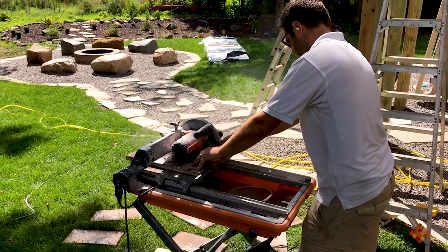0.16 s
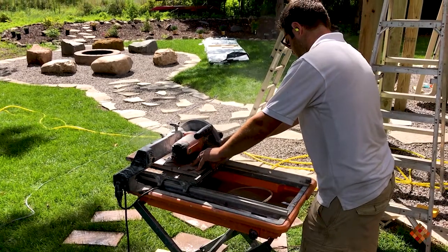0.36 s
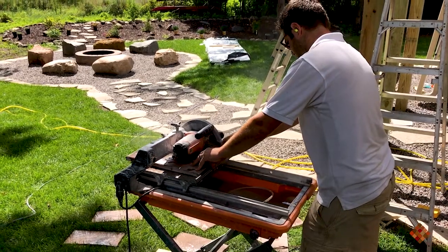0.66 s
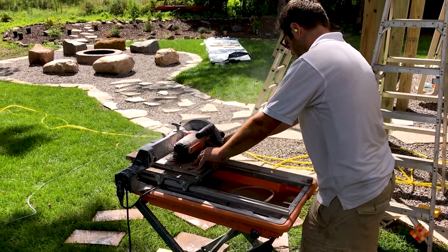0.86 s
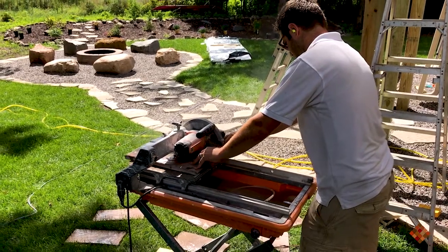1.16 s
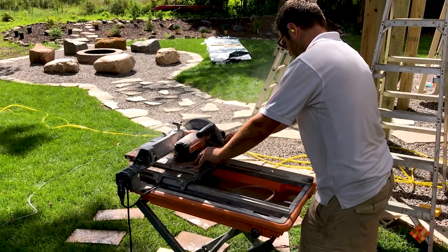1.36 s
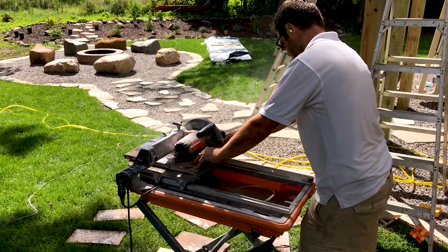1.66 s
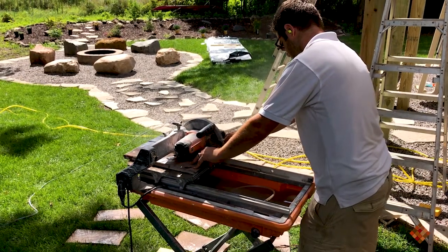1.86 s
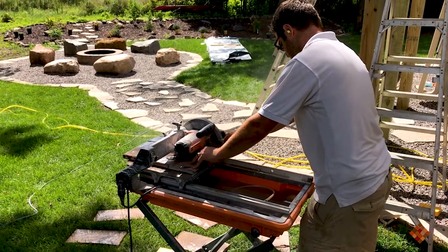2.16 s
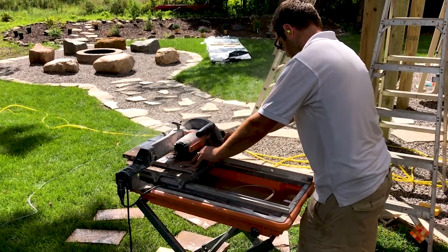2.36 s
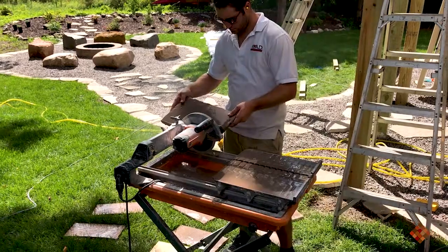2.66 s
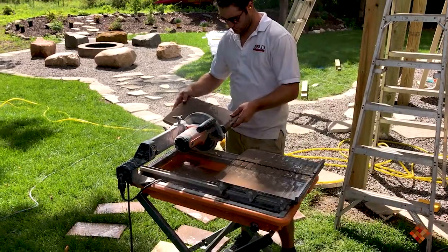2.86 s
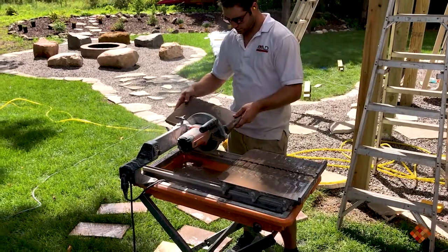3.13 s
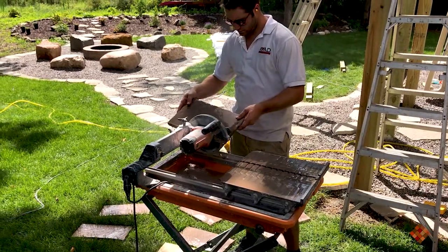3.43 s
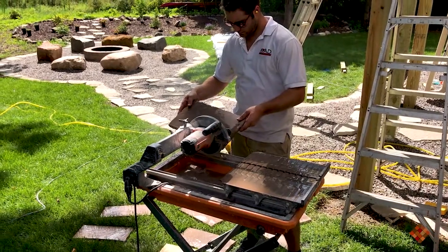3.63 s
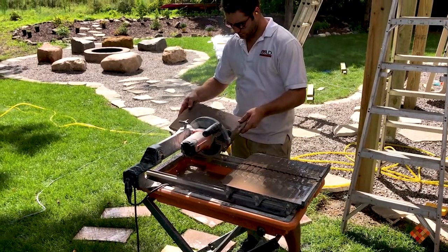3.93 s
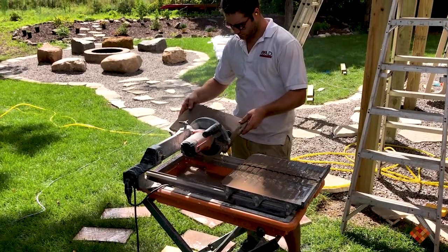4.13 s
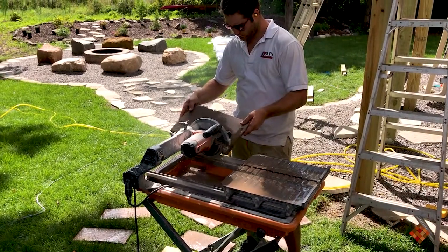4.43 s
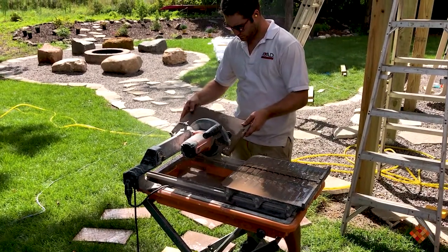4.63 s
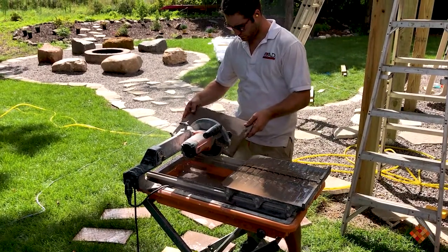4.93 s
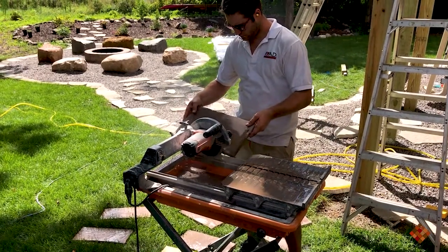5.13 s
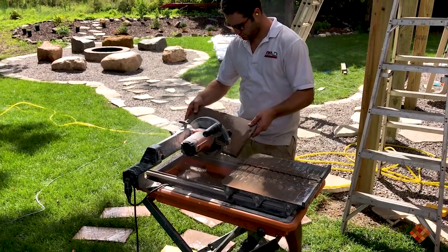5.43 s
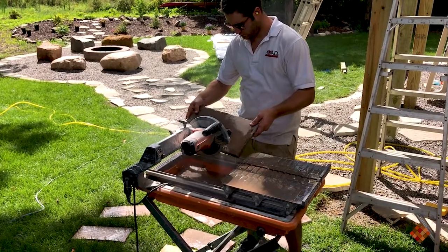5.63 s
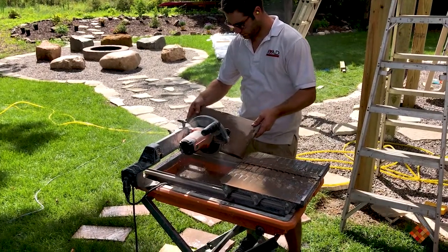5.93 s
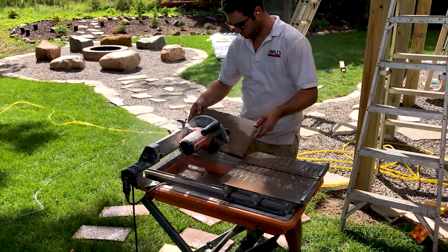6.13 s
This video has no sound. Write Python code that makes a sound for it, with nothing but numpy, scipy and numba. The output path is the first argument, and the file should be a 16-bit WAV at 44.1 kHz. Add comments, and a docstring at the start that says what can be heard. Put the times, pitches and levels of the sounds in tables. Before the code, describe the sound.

A wet tile saw cuts concrete tile outdoors, a few metres away, and sounds without a break for about six seconds. From the start, a deep cut gives a gritty rasp and a high, ringing steel whine, with hissing water spray and a quieter motor hum beneath. Around 1.2 seconds the motor sags under load and the blade squeals briefly; it speeds up again, with more short squeals near 2.4 seconds. At about 2.5 seconds the sound jumps to a lighter trimming cut with a higher motor pitch. Its opening stutters, restarting at roughly 3, 3.5, 3.8, 4.3 and 4.8 seconds, mostly with a soft low thump, and is a little quieter between 3 and 3.5 seconds. From 4.8 seconds the trim plays through, with pulsing spray, short metallic squeals and a slightly sinking whine, still cutting at the end.

```python
"""A wet tile saw cutting

A few metres away on a lawn, a saw grinds through concrete: a deep cut drags the motor down, then
the sound jumps to a light trim of a hand-held tile, whose opening stutters before it plays through.
Diamond grit chips the stone and rings the steel blade, water spray hisses and the geared motor hums."""
import sys
import numpy as np
from scipy import signal
from scipy.fft import rfft, irfft, next_fast_len
from scipy.io import wavfile
from scipy.ndimage import uniform_filter1d
from numba import njit

SR = 44100
rng = np.random.default_rng(int(sys.argv[2]) if len(sys.argv) > 2 else 0)


def master_out(mix):
    """Clip the mix to full scale and print it as 16-bit PCM to the path in sys.argv[1]."""
    frames = np.transpose(np.atleast_2d(mix))
    ceiling = np.clip(frames, -1, 1)
    pcm = np.round(ceiling * 32767).astype(np.int16)
    wavfile.write(sys.argv[1], SR, pcm)


N = 277564

# How fast the blade spins as the load changes. Each row: time in seconds, turns per second.
CUT_SPIN = [(0, 81.2), (.95, 81.1), (1.25, 76.1), (1.55, 76.9), (1.8, 79.6), (2.2, 82.7), (2.38, 86.1),
            (2.54, 87.2)]
TRIM_SPIN = [(4.85, 100.9), (5.42, 99.5), (5.6, 97.6), (6.28, 96.9)]


def saw(t, deep):
    """One pass through the stone: the deep cut if deep is true, otherwise the light trim."""
    speed = follow(CUT_SPIN if deep else TRIM_SPIN, t) * (1 + 0.00095 * wander(t, 25.86))
    turns = np.cumsum(speed) / SR
    # faster spin stiffens the disc and raises its notes
    pitch = (speed / speed[:SR // 2].mean()) ** (0.0254 if deep else 0.14)
    rasp, ring, spray = effort(t, deep)
    strikes = grit(t, turns, deep, spread_db=2.0 if deep else 2.5)
    stone = stone_and_spray(t, turns, rasp, spray, deep)
    steel = blade(t, strikes, pitch, rasp, ring, spray, deep)
    singing = ring * whine(t, pitch, deep)
    return stone + steel + singing + motor(t, speed, turns, deep)


# How hard the stone is pushed. Each row: time in seconds, relative level of the rasp in dB.
CUT_PRESSURE = [(0, -0.8), (.4, -0.3), (1.1, 1), (1.35, 1.5), (1.47, -1), (1.62, 0.8), (1.72, 1.1),
                (2.54, -0.5)]
TRIM_PRESSURE = [(4.85, 0.8), (5.25, 0.41), (5.42, 0.49), (5.62, -1.9), (5.9, -1.2), (6.28, -0.013)]
# Moments when the blade bites deeper. Each row: peak time in seconds, fade time in seconds,
# change of the spray in dB, change of the ringing in dB.
DEEP_BITES = [(.04, 0.1, 2, 2), (.26, .05, 5.5, -0.5), (.6, 0.067, 3, 2.5), (.85, 0.086, 2.5, 1),
              (1.07, 0.057, 3, 1.5), (1.28, 0.12, 3.5, 0), (1.82, 0.13, 2, 2.5), (1.99, 0.015, -2, 5),
              (2.2, 0.035, 1.5, 2), (2.42, 0.096, 0, 2), (4.86, 0.075, 5, 2.5), (5.02, 0.076, 4, 1),
              (5.18, 0.044, 4, -0.5), (5.3, 0.099, 4.2, 1.5), (5.49, .035, 4.2, 1.5), (5.71, 0.037, 5.2, 4),
              (5.89, 0.034, 4.5, 3.5), (6.28, 0.14, 6.5, 1)]


def effort(t, deep):
    """Strength of rasp, ring and spray: pushing sets them, bites swell them, uneven stone shakes them."""
    push_db = follow(CUT_PRESSURE if deep else TRIM_PRESSURE, t)
    bite_ring_db = bite_spray_db = 0
    for peak, fade, spray_change, ring_change in DEEP_BITES:
        width = np.where(t < peak, 0.73 * fade, fade)  # rises faster than it fades
        swell = np.exp(-((t - peak) / width) ** 2)
        bite_ring_db += ring_change * swell
        bite_spray_db += spray_change * swell
    grain_hz = 31.83
    rasp_db = push_db + 0.16 * bite_ring_db + 0.5 * wander(t, grain_hz)
    ring_db = 0.74 * push_db + bite_ring_db + 0.44 * wander(t, grain_hz)
    spray_db = 0.11 * push_db + bite_spray_db + 0.58 * wander(t, grain_hz)
    return [unit(undb(db)) for db in (rasp_db, ring_db, spray_db)]


def grit(t, turns, deep, spread_db):
    """Countless tiny chips of uneven size break off; the blade's high side bites harder once a turn."""
    wobble, chatter_db = (0.18, 0.56) if deep else (0.019, 0.5)
    noise = rng.standard_normal(len(t))
    sizes = np.repeat(rng.standard_normal(len(t) // 16 + 1), 16)[:len(t)]  # 16 samples a chip
    chips = noise * undb(spread_db * sizes)
    bite = np.exp(wobble * (np.cos(2 * np.pi * turns) + 0.5 * np.cos(4 * np.pi * turns)))
    return unit(chips * bite * undb(chatter_db * wander(t, 70)))


# The notes that ring in the buried blade and the tile (cut), and in the nearly free blade (trim).
# Each row: pitch in Hz, width in Hz (narrow rings longer), relative level in dB.
CUT_RINGING = [(837, 19, -47.5), (1127, 146, -36), (1234, 53, -45.5), (1507, 5.5, -51), (1615, 54, -38),
               (2186, 27, -41.5), (2998, 30, -34), (2990, 110, -41.5), (3292, 110, -34), (3404, 56, -36.5),
               (3536, 52, -35), (3828, 23, -37), (3910, 36, -42.5), (3926, 20, -39.5), (4050, 45, -35.5),
               (4590, 35, -38.5), (4984, 86, -39), (5520, 64, -38), (5844, 69, -38), (6500, 85, -57),
               (6840, 110, -43), (7290, 20, -43), (7960, 49, -44), (8140, 340, -36.5), (8920, 80, -41.5),
               (9535, 110, -35), (11400, 330, -34), (11600, 130, -43.5), (12800, 170, -41.5),
               (14400, 400, -44)]
TRIM_RINGING = [(1159, 61, -38), (1322, 19, -45.5), (1682, 17, -39.5), (2270, 21, -43.5), (3064, 64, -39.5),
                (3310, 52, -36), (3538, 43, -31), (3840, 100, -34), (3853, 120, -36), (3970, 27, -37.5),
                (3954, 14, -41), (4032, 38, -37.5), (4624, 220, -37), (4920, 11, -45), (5010, 30, -35),
                (5800, 9.9, -48.5), (5790, 24, -34.5), (6130, 22, -37.5), (5940, 170, -53),
                (6770, 420, -33), (7918, 18, -46), (8000, 32, -41.5), (8940, 53, -56), (9430, 31, -39.5),
                (9780, 28, -44), (9940, 88, -57), (11780, 160, -39.5), (12240, 61, -34), (13600, 49, -38),
                (14117, 22, -61)]


def blade(t, strikes, pitch, rasp, ring, spray, deep):
    """Grit rings the steel; the shifting contact favours one note, then another."""
    notes, swell_db, level_db = (CUT_RINGING, 0.43, -0.62) if deep else (TRIM_RINGING, 0.64, -2.5)
    out = 0
    for k, (hz, width, db) in enumerate(notes):
        strength = rasp if hz < 2750 else ring if hz < 7100 else spray
        contact = np.roll(strikes, 7 * k) * undb(swell_db * wander(t, 22))
        out += undb(db) * unit(resonate(contact * strength, hz * pitch, float(width)))
    return undb(level_db) * out


# The broad noise of breaking stone and water. Each row: frequency in Hz, relative level in dB.
CUT_NOISE = [(30, -90), (90, -90.5), (190, -84.5), (330, -73), (440, -90.5), (560, -71.5), (850, -70),
             (1200, -66.5), (1850, -76.5), (3500, -62), (4400, -73), (10500, -74), (14500, -68),
             (15700, -74)]
TRIM_NOISE = [(30, -93), (80, -80), (190, -88.5), (280, -78), (420, -84.5), (560, -74.5), (900, -75),
              (1400, -69.5), (2600, -66.5), (3500, -68.5), (4300, -72), (8000, -70.5), (14000, -70.5),
              (15700, -76)]


def stone_and_spray(t, turns, rasp, spray, deep):
    """Coarse chips make the low rasp; fine grit and water make the high hiss."""
    spectrum, level_db = (CUT_NOISE, -1) if deep else (TRIM_NOISE, 0.3)
    chips = grit(t, turns, deep, spread_db=0.5 if deep else 2.5)
    broad = shimmer(colour(chips, spectrum), depth_db=7.0 if deep else 6.5, spacing_hz=44.8)
    coarse = signal.sosfiltfilt(signal.butter(2, 4000, fs=SR, output="sos"), broad)
    fine = broad - coarse
    return undb(level_db) * (coarse * rasp + fine * spray)


def shimmer(x, depth_db, spacing_hz):
    """The disc's many high notes carve narrow peaks and dips into the hiss."""
    size = next_fast_len(len(x))
    hz = np.fft.rfftfreq(size, 1 / SR)
    ripple = np.interp(hz / spacing_hz, np.arange(2048), rng.standard_normal(2048))
    gain = undb(depth_db * np.clip(hz / 10000, 0, 1) * ripple)
    gain /= np.sqrt(uniform_filter1d(gain ** 2, len(hz) // 20))  # keeps the overall balance
    return irfft(rfft(x, size) * gain, size)[:len(x)]


# Thin, lasting tones of the rubbed rim. Each row: pitch in Hz, relative level in dB.
CUT_RIM_TONES = [(3892, -35.5), (4570, -55), (7230, -43), (7983, -58), (9012, -53), (9507, -56),
                 (11235, -59), (12936, -61)]
TRIM_RIM_TONES = [(1168, -45), (2277, -41), (3074, -42), (3329, -51), (4812, -39), (5026, -37), (5798, -50),
                  (6158, -41), (6818, -39), (7912, -58), (8165, -43), (8682, -47), (9108, -52), (9334, -40),
                  (10077, -74), (11750, -41.5), (12132, -62), (12665, -55), (13655, -56), (14765, -53)]


def whine(t, pitch, deep, waver_hz=4.44, flutter_db=5.0):
    """Steady rubbing keeps the blade singing; its tones sag with speed and flutter as contact shifts."""
    out = 0
    for hz, db in CUT_RIM_TONES if deep else TRIM_RIM_TONES:
        phase = 2 * np.pi * np.cumsum(hz * pitch + waver_hz * wander(t, 111.1)) / SR
        flutter = undb(flutter_db * wander(t, 69.9))
        out += undb(db) * unit(flutter * np.sin(phase))
    return out


# Moments when the rim catches.
# Each row: peak time in seconds, rough length in seconds, pitch in Hz, level in dB.
RIM_CATCHES = [(1.156, 0.11, 1147, -38), (1.354, .17, 3934, -28.5), (2.327, .26, 2990, -35.5),
               (2.446, 0.19, 3310, -34), (2.404, .3, 9520, -32), (5.019, 0.21, 5026, -31.5),
               (5.383, 0.22, 1695, -36.5), (5.452, 0.04, 3960, -30), (5.55, 0.12, 5610, -37),
               (5.654, 0.23, 3900, -32), (5.862, 0.086, 1179, -35.5)]


def squeals(t, waver_hz, flutter_db):
    """Friction feeds a single note of the blade for a moment; it swells, wavers and dies."""
    out = 0
    for peak, length, hz, db in RIM_CATCHES:
        phase = 2 * np.pi * np.cumsum(hz + waver_hz * wander(t, 120)) / SR
        level = undb(db + flutter_db * wander(t, 91.1))
        swell = np.exp(-2 * ((t - peak) / length) ** 2)
        out += level * swell * np.sqrt(2) * np.sin(phase)
    return out


# The hum of the drive. Each row: pitch as a multiple of the blade speed, level in dB at starting speed.
# The gear teeth meet 32 times per blade turn, and the motor turns 32 / 7 times.
CUT_MOTOR_TONES = [(2, -69), (3, -57), (4, -63.5), (10, -48), (12, -50), (18, -67), (19, -48), (20, -51),
                   (31, -51), (32, -46.5), (33, -52), (34, -60)]
TRIM_MOTOR_TONES = [(3 / 4, -73), (0.94, -67), (2, -71.5), (3, -57), (32 / 7, -64.5), (6, -57.5),
                    (13 / 2, -63.5), (8, -62), (17, -46), (33, -40.5)]


def motor(t, speed, turns, deep, waver_db=2.0):
    """Shaft, motor and gears hum unsteadily; the high tones grow much louder with speed."""
    out = 0
    for multiple, db in CUT_MOTOR_TONES if deep else TRIM_MOTOR_TONES:
        swell = (speed / speed[0]) ** (7.1 * multiple / 32)
        level = undb(db + waver_db * wander(t, 14))
        phase = 2 * np.pi * (multiple * turns + rng.random())
        out += swell * level * np.sqrt(2) * np.sin(phase)
    return out


# One low thump: start in seconds, pitch in Hz, seconds to fade by 60 dB, level in dB.
LOW_THUMP = (4.85, 132, .2, -46)


def thump(t, rise_s=0.006):
    """A soft, low thump where the trim starts, heard again at each restart of the stutter."""
    start, hz, fade, db = LOW_THUMP
    age = np.maximum(t - start, 0)
    envelope = (1 - np.exp(-age / rise_s)) * np.exp(-np.log(1000) * age / fade)
    return undb(db) * envelope * np.sin(2 * np.pi * hz * age)


def undb(db):
    """Turn decibels into a gain to multiply by."""
    return 10 ** (np.asarray(db) / 20)


def unit(x):
    """Scale a signal to an average (rms) level of 1."""
    return x / np.sqrt(np.mean(x ** 2))


def follow(table, t):
    """Join (time, value) rows with straight lines and read them at times t."""
    return np.interp(t, *np.transpose(table))


def wander(t, rate):
    """A smooth random drift of size about 1, with rate new values a second."""
    drift = np.interp((t - t[0]) * rate, np.arange(2048), rng.standard_normal(2048))
    return unit(uniform_filter1d(drift, max(int(SR / rate / 2), 1)))


def colour(x, points):
    """Shape white noise to follow (Hz, dB) points; it falls away below the first."""
    hz, db = np.transpose(points)
    size = next_fast_len(len(x))
    freqs = np.fft.rfftfreq(size, 1 / SR) + 1e-3
    gain = undb(np.interp(np.log(freqs), np.log(hz), db)) * np.minimum(freqs / hz[0], 1) ** 2
    return irfft(rfft(x, size) * gain * np.sqrt(SR / 2), size)[:len(x)]


@njit
def resonate(x, hz, width):
    """A filter that rings at one note, whose pitch may move every sample."""
    out, band, low = np.empty(len(x)), 0., 0.
    for i in range(len(x)):
        tuning = np.tan(np.pi * hz[i] / SR)
        damping = np.pi * width / SR * (1 + tuning ** 2) / tuning  # keeps the width true in the treble
        out[i] = (band + tuning * (x[i] - low)) / (1 + tuning * (tuning + damping))
        band = 2 * out[i] - band
        low += 2 * tuning * out[i]
    return out


# The trim's stutter; each piece plays until the next begins.
# Each row: start in seconds, point on the trim's own clock that it plays from in seconds.
TRIM_PIECES = [(2.545, 4.845), (3.045, 4.845), (3.545, 5.045), (3.845, 4.845), (4.345, 4.845),
               (4.845, 4.845)]


def scene():
    """The deep cut, then the stuttering trim; both channels are alike."""
    t = np.arange(N) / SR
    cut_end, trim_start = round(2.545 * SR), round(4.845 * SR)
    cut_t, trim_t = t[:cut_end], t[trim_start:]
    cut = saw(cut_t, deep=True)
    trim = saw(trim_t, deep=False)
    cut += squeals(cut_t, waver_hz=11.1, flutter_db=4.0)
    trim += squeals(trim_t, waver_hz=7.7, flutter_db=1.3) + thump(trim_t)
    out = np.pad(cut, (0, N - len(cut)))
    for k, (start, source) in enumerate(TRIM_PIECES):
        first = round(start * SR)
        piece = trim[round(source * SR) - trim_start:][:N - first]
        level_db = -5 if k == 1 else 0  # the second piece is quieter
        out[first:first + len(piece)] = piece * undb(level_db)
    return np.array([out, out])


def record(dry):
    """A steep filter removes the highest treble, above 15750 Hz."""
    return signal.sosfilt(signal.ellip(12, 0.1, 90, 15750, fs=SR, output="sos"), dry)


dry = scene()
out = record(dry)
master_out(out)
```